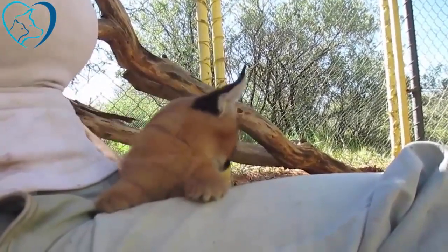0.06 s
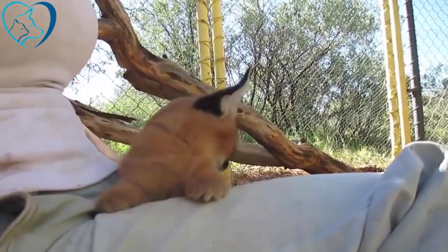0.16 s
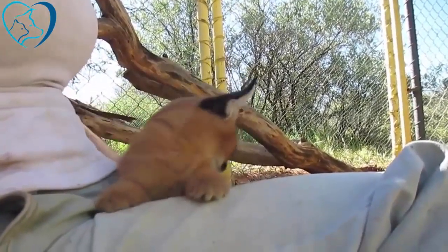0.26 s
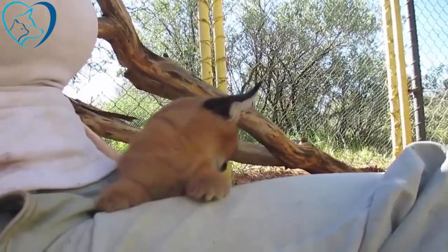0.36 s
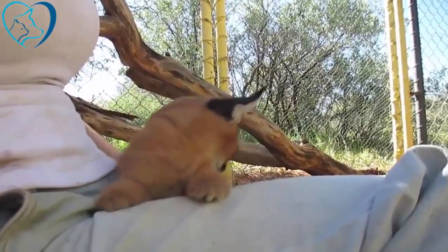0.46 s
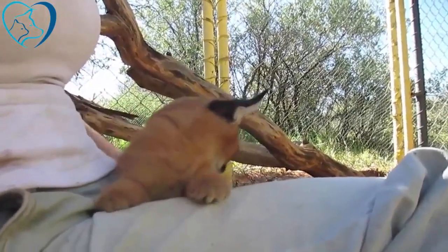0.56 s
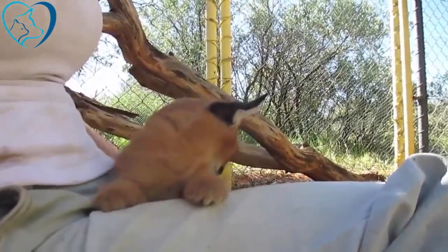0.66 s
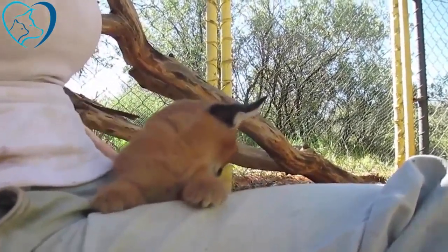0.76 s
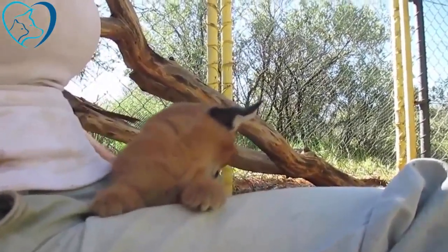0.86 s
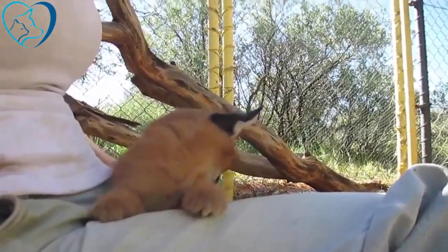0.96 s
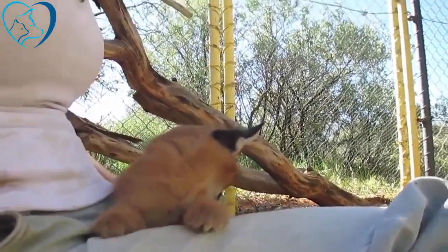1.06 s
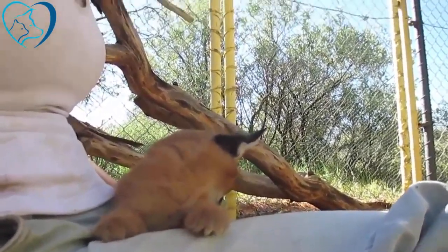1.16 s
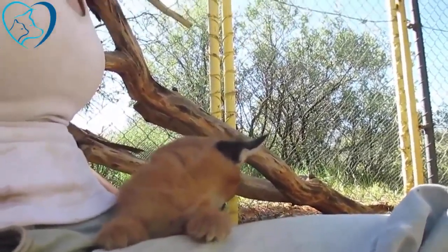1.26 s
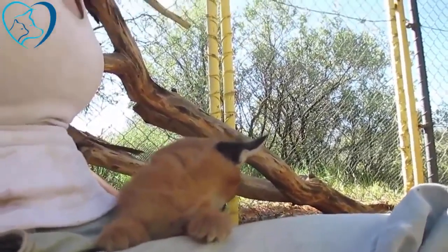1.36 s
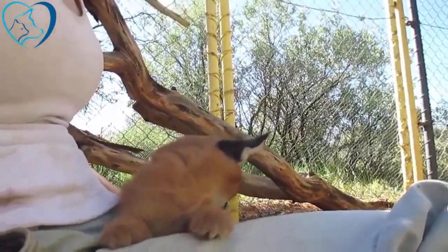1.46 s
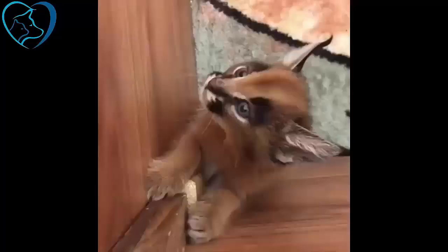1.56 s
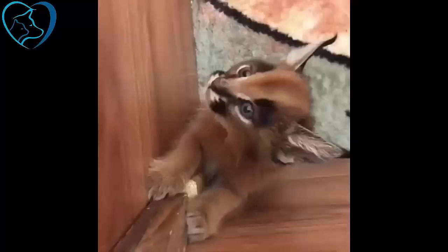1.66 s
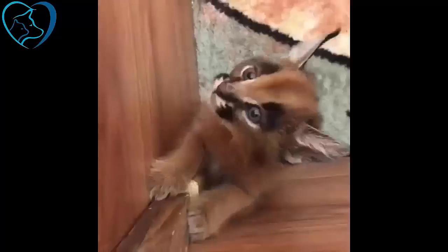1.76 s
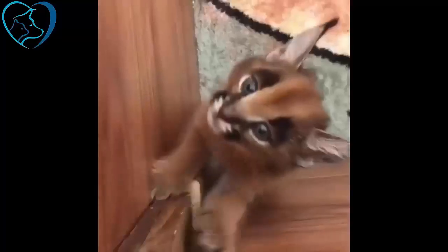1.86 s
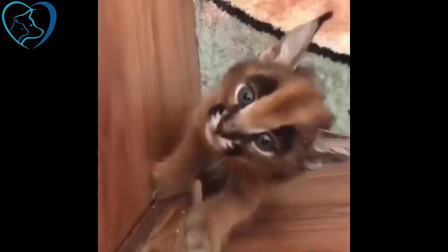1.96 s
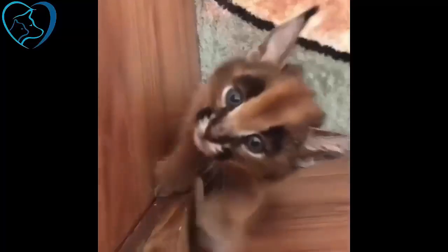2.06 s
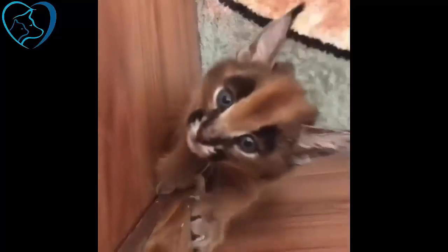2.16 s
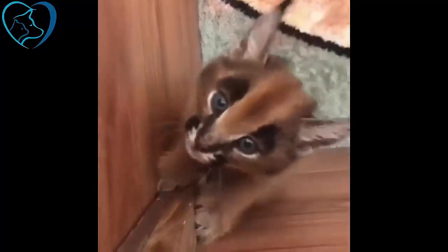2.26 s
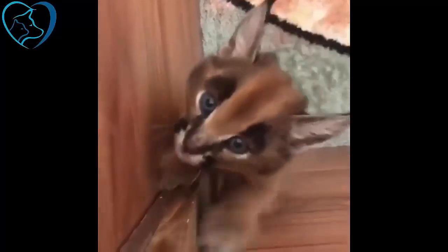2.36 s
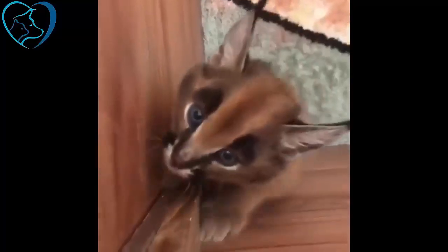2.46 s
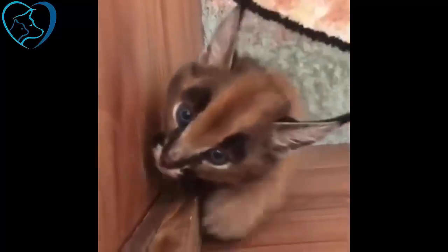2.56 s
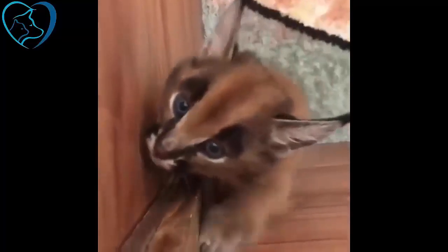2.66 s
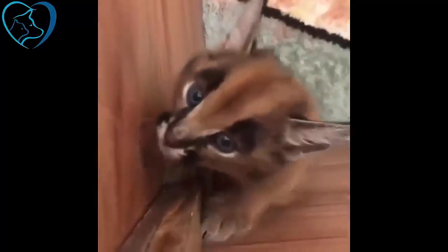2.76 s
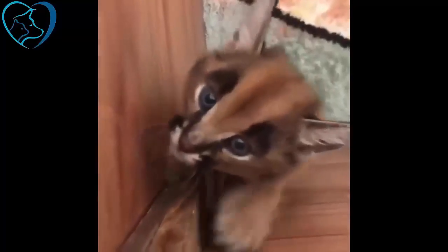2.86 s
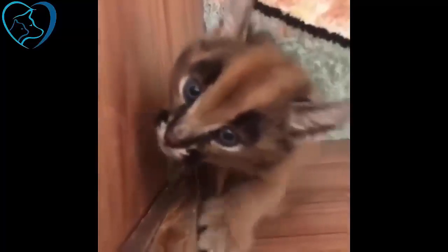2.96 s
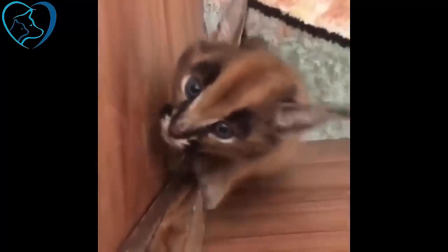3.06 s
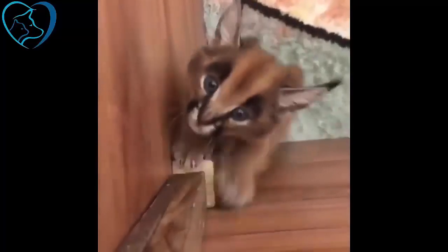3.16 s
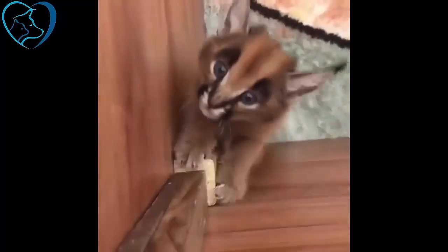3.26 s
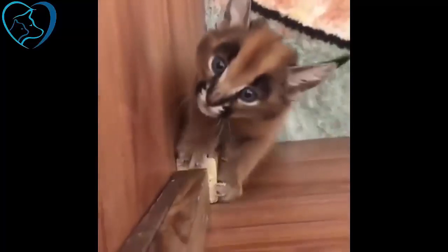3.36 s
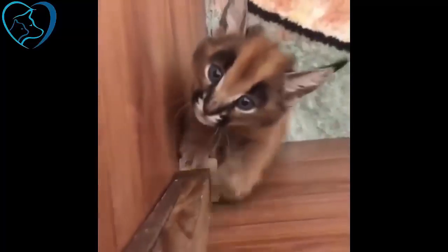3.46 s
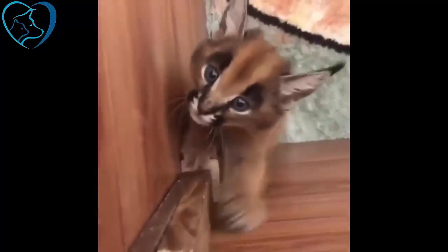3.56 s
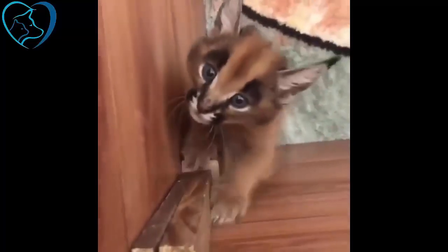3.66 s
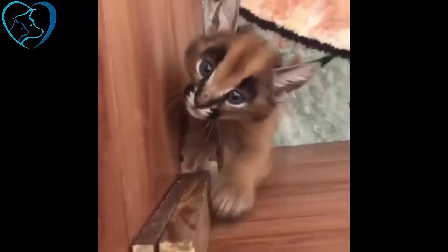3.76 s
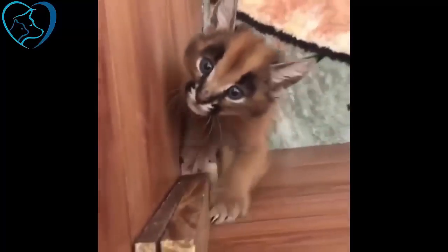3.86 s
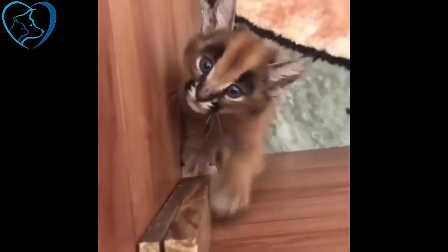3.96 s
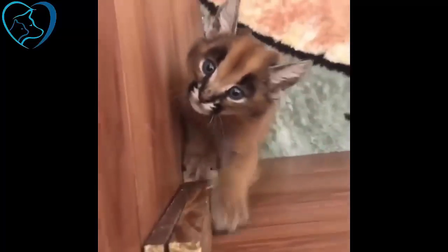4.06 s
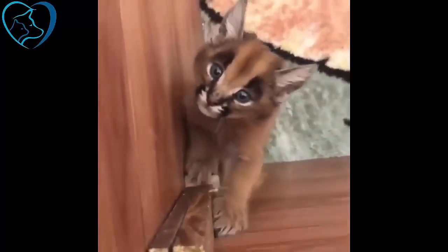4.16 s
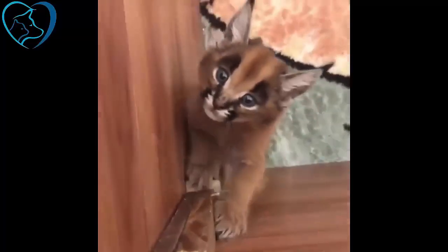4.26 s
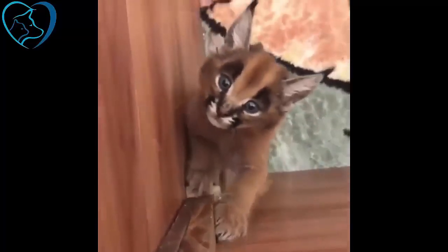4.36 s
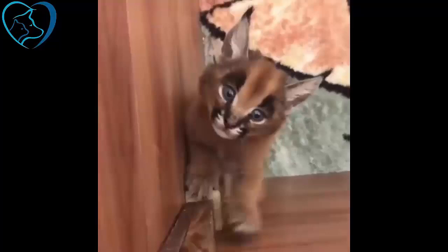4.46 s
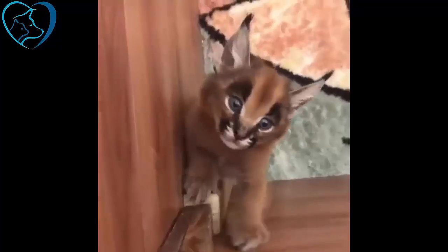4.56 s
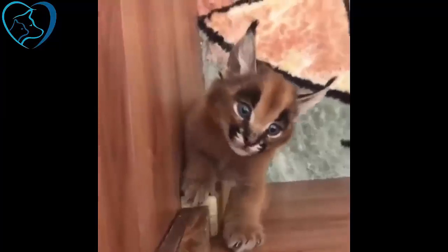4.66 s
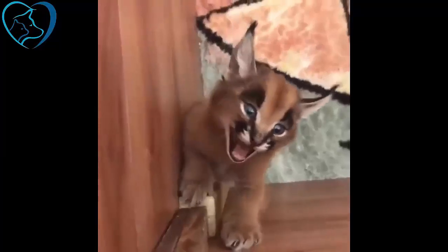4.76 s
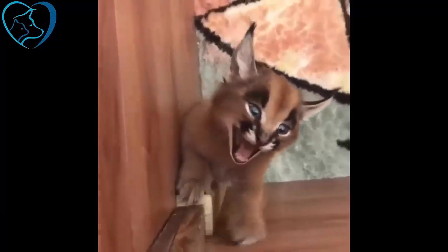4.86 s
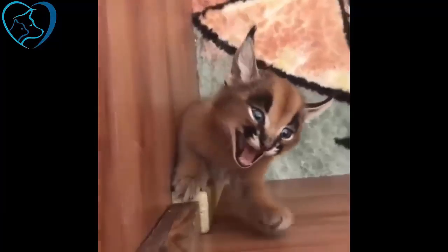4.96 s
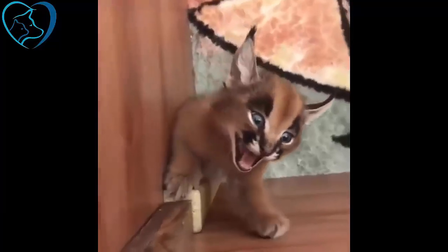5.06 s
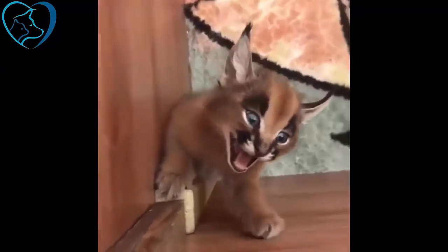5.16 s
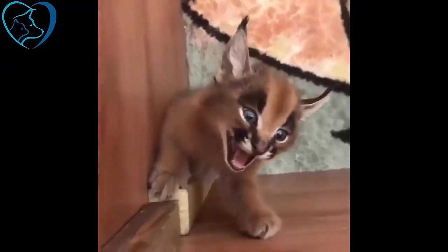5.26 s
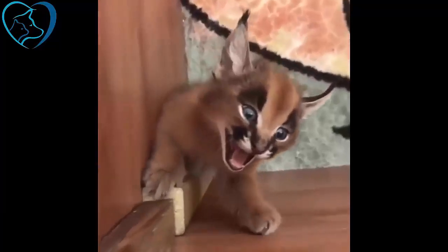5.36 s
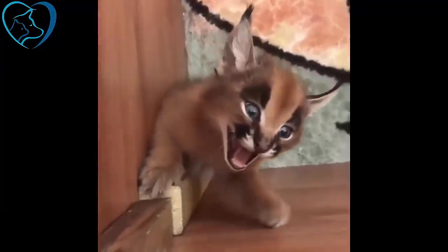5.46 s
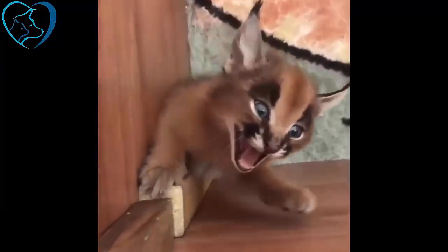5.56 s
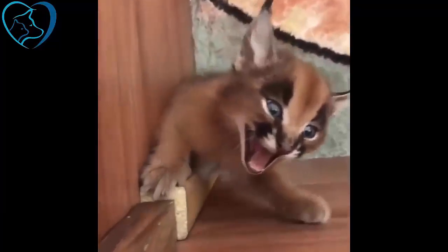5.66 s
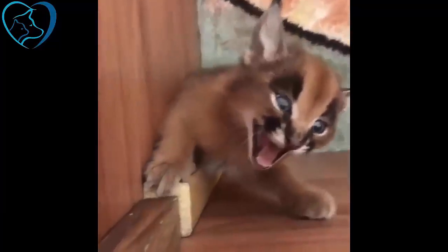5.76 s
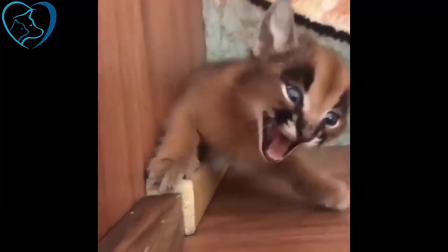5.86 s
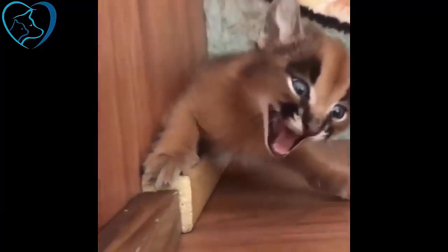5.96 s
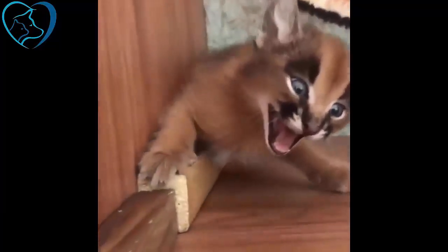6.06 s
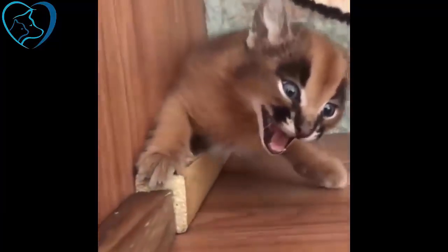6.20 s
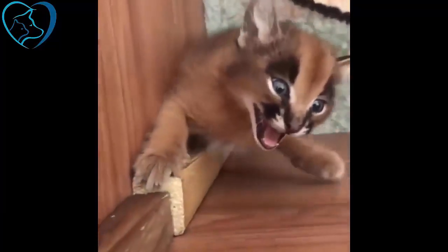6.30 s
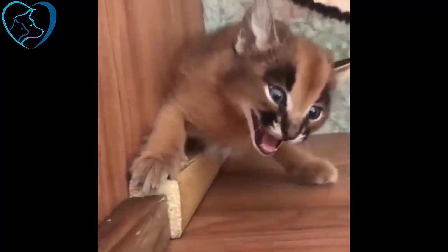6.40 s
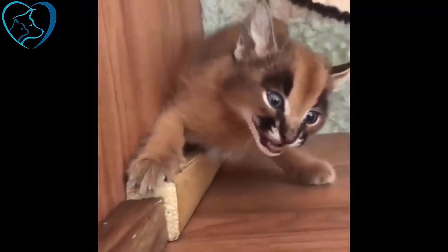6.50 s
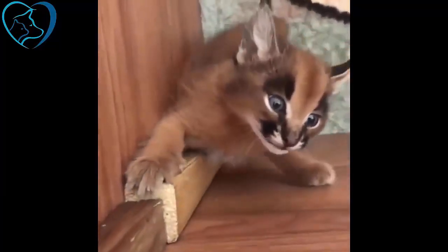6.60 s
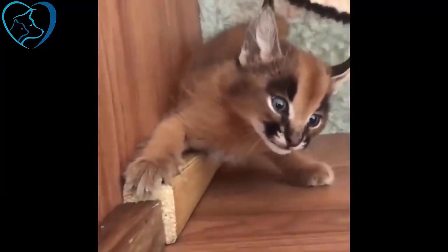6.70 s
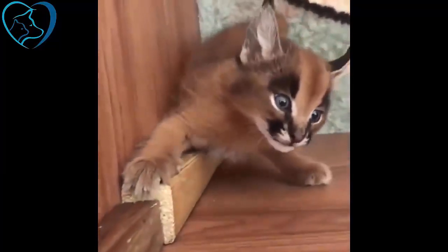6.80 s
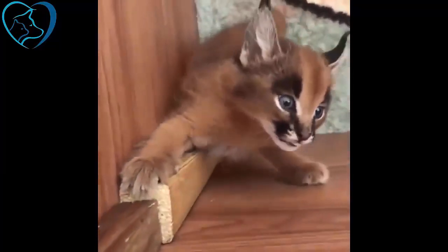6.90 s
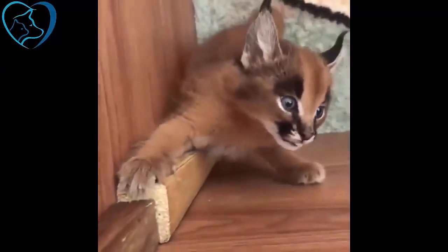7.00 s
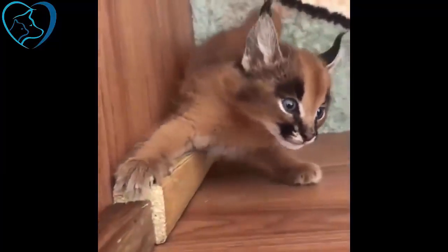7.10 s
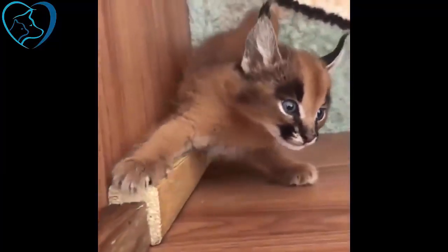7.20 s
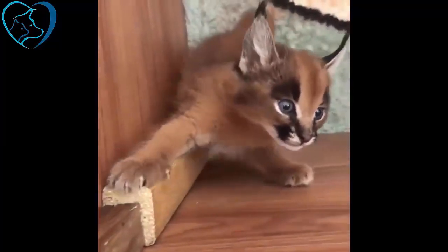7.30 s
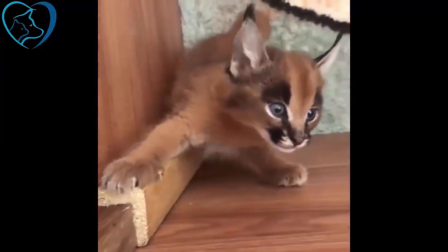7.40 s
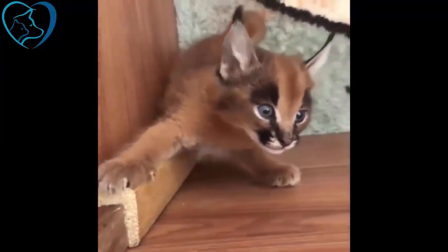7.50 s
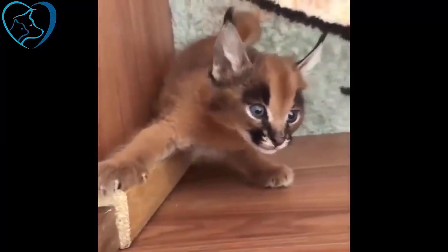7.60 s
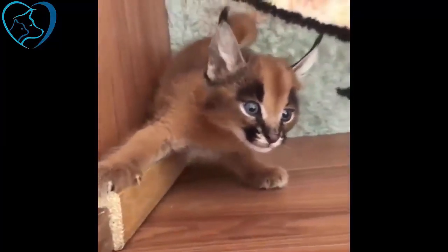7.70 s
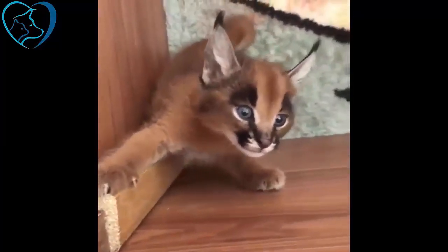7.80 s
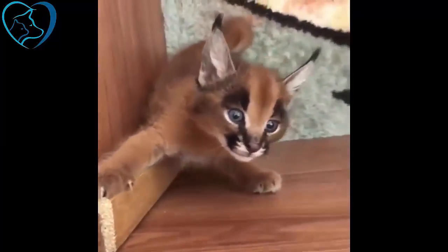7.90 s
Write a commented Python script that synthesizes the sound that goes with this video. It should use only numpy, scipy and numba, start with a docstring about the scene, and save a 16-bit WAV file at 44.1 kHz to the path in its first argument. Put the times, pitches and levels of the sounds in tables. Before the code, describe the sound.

An outdoor engine hum with rustling cloth stops dead, then claws scrabble and knock on wood before a kitten gives a long fluttering hiss.

```python
"""A wild kitten scrabbles on wooden boards, then gives a long hiss in two surges: its throat flutters
35-41 times a second, and each puff of air carries an arching whistle through the open mouth.
Claws are catching, slipping noise; knocks ring the modes of the wood; a small room answers.
Before that, outdoors, an engine hums in sines, an insect whines and clothing rustles in patchy noise;
this stops dead, and after a short silence the room's still air opens."""
import sys
import numpy as np
from scipy import signal
from scipy.fft import rfft, irfft, next_fast_len
from scipy.io import wavfile
from scipy.ndimage import uniform_filter1d
from numba import njit

SR = 44100
rng = np.random.default_rng(int(sys.argv[2]) if len(sys.argv) > 2 else 0)


def wav_out(sig):
    """Save sig, one row per channel (or a flat mono array), as 16-bit PCM at SR to the path in sys.argv[1]."""
    wavfile.write(sys.argv[1], SR, np.round(np.clip(np.atleast_2d(sig).T, -1, 1) * 32767).astype(np.int16))


N = 350154
T = np.arange(N) / SR

# when the outdoors stops and the room's air opens
CUT_S, ROOM_S = 1.452, 1.85

# engine hum, before its waver: t/s, f/Hz, level/dB
ENGINE_HUM = [(0, 111.2, -35.5), (.15, 103.5, -35), (.3, 90.7, -39), (.6, 94.3, -46.5), (.72, 98.35, -38.5),
              (.98, 97.7, -34), (1.06, 97, -40.5), (1.44, 99.4, -33)]
# a second drone that sinks away, before its waver: t/s, f/Hz, level/dB
SINKING_DRONE = [(0, 162.5, -33.5), (.12, 153, -36.5), (.28, 140.5, -43), (.5, 122.9, -45.5),
                 (.7, 120.8, -54)]
# resonances of the hollow rush: f/Hz, width/Hz, level/dB
RUSH_MODES = [(769.5, 90, 7), (911, 68, 6.5), (1200, 145, 6), (1420, 110, -12.5), (1688, 63, -2.5)]
# colour of the outdoor air: f/Hz, level/dB
OUTDOOR_COLOUR = [(15, -55), (25, -28.5), (63, -13), (99, -16.5), (126, -13.5), (202, -11.5), (250, -25),
                  (293, -17.5), (414, -31.5), (1190, -38.5), (1510, -37), (2780, -41.5), (14000, -64)]
# colour of the rustles: f/Hz, level/dB
RUSTLE_COLOUR = [(88, -35.5), (150, -3), (257, 0.5), (589, 2), (883, -3), (1200, -4.5), (1600, -11.5),
                 (2230, -9), (2700, -17.5), (4910, -15.5), (10400, -31), (15000, -30)]
# colour of the sliding cloth: f/Hz, level/dB
SLIDE_COLOUR = [(180, -21.5), (300, -10.5), (669, -10), (788, -6.5), (975, -11.5), (1350, -2.5),
                (1700, -11.5), (2780, -7), (3920, -17), (4930, -12.5), (7790, -26), (10600, -26.5),
                (15000, -36)]
# rustling clothes: t/s, level/dB, hold/s, release/s
RUSTLES = [(0, -54.5, 0.63, .1), (.51, -45.5, .025, 0.18), (.705, -33, .06, 0.043)]
# cloth sliding on cloth: t/s, level/dB, hold/s, release/s
SLIDES = [(1.04, -42.5, 0.079, 0.074), (1.14, -38, 0.052, 0.18), (1.25, -37.5, .03, 0.17)]
CLOTH_ATTACK_S = .09
# a single bird chip: t/s, peak level/dB, top f/Hz, length/s
BIRD_CHIP = [(.42, -48.5, 4840, 0.017)]
# bumps on the microphone body: t/s, peak level/dB
BUMPS = [(0.497, -16), (0.504, -15), (0.515, -27)]
# tiny ticks of twigs: t/s, peak level/dB
TWIG_TICKS = [(.553, -43), (.904, -43), (1.327, -29)]
# the hollow rush of air holds, then drops away
RUSH_DB, RUSH_FAINT_DB, RUSH_UNTIL_S, RUSH_RELEASE_S = -36, -53.5, 0.52, 0.17
# the insect sings out, then carries on faintly
INSECT_DB, INSECT_FAINT_DB, INSECT_UNTIL_S, INSECT_RELEASE_S = -63, -71.5, .5, .2

# colour of the room's still air: f/Hz, level/dB
ROOM_COLOUR = [(15, -43), (25, -9), (80, -6), (225, -13), (363, -9), (460, -18.5), (599, -11.5),
               (868, -16.5), (1260, -20.5), (1680, -24), (3440, -31.5), (11000, -36.5), (14000, -32.5)]
ROOM_AIR_DB = -68.35
# echoes from the boards of the corner: delay/ms, level/dB
CORNER_ECHOES = [(1.298, -27.5), (3.4, -18.5), (5.6, -18)]

# soft paw falls: t/s, peak level/dB, f/Hz, t60/s
PAW_FALLS = [(2.162, -41.5, 241, 0.23), (2.39, -45.5, 250, 1), (2.955, -58, 283, 0.11),
             (3.11, -28, 222, 0.077), (3.855, -44, 290, 0.3), (4.09, -53, 257, 0.39),
             (6.31, -45, 74.4, 0.55), (6.331, -48.5, 138, 0.56), (7.459, -52.5, 171, 0.96)]
# paws scuffing the boards: t/s, hold/s, claw scrape level/dB, wood grind level/dB, rumble level/dB
SCUFFS = [(2.261, 0.025, -52, -57.5, -54.5), (2.386, 0.014, -47.5, -58.5, -63),
          (2.455, 0.037, -56.5, -56.5, -51.5), (2.572, 0.08, -57.5, -54.5, -53),
          (2.722, 0.018, -59, -56, -53), (2.808, 0.0085, -49.5, -55, -53), (2.906, 0.019, -56, -59.5, -57),
          (2.958, 0.072, -60.5, -59, -48), (3.127, 0.0068, -40, -44.5, -38),
          (3.153, 0.019, -51, -36.5, -44), (3.213, .01, -41.5, -45.5, -41),
          (3.283, 0.017, -43.5, -41.5, -40), (3.325, 0.075, -53, -51.5, -49), (3.421, 0.026, -58, -50, -50),
          (3.539, 0.052, -66, -57.5, -58.5), (3.628, 0.1, -64.5, -64.5, -75),
          (3.853, 0.0049, -54.5, -64, -66), (3.913, .04, -64, -70.5, -66), (4.088, 0.038, -56.5, -64, -65),
          (4.328, 0.015, -60.5, -76, -67), (4.446, 0.2, -80.5, -78, -71), (6.374, 0.25, -77, -77, -66.5),
          (7.393, .08, -77.5, -87, -79), (7.867, 0.03, -77, -83, -84)]
# a scuff swells and dies quickly; the boards rumble on
SCUFF_ATTACK_S, SCUFF_RELEASE_S, RUMBLE_ATTACK_S, RUMBLE_RELEASE_S = 0.032, .06, 0.027, 0.22
# colour of the claws: f/Hz, level/dB
SCRAPE_COLOUR = [(900, -39), (2000, -12), (2700, -3.5), (3700, -1), (4400, 3), (5400, -5), (6700, -2.5),
                 (8000, -11), (10500, -14), (13000, -15)]
# colour of the ground wood: f/Hz, level/dB
GRIND_COLOUR = [(250, -31), (480, 2), (690, 8), (900, 4.5), (1150, 2), (1400, -1), (1650, -1),
                (2100, -14.5), (3000, -11), (4500, -38)]
# low resonances of the boards: f/Hz, width/Hz, level/dB
RUMBLE_MODES = [(87, 26, -0.5), (141, 13, 6.5), (197.6, 26, -0.5), (261.6, 17, -4.5), (315.4, 28, 2),
                (400.4, 19, -8), (478, 30, -10)]
# claw and wood knocks: t/s, level/dB, then against it body level/dB and untrimmed crack level/dB
KNOCKS = [(2.264, -33.5, -4.5, -25), (2.378, -34, -25, -3), (2.401, -28, -33, -1.5),
          (2.816, -28, -13.5, -9), (2.928, -46, -20, 3), (2.955, -20, -6.5, -7), (2.961, -23, -8.5, -14),
          (3.123, -46, -15, -15), (3.166, -23.5, -10, -4.5), (3.202, -13, -13.5, -3.5),
          (3.206, -15.5, -19, -1), (3.275, -24.5, -8.5, -15), (3.29, -39, -16, -8),
          (3.336, -25.5, -8, -10.5), (3.392, -27, -4, -2), (3.855, -31, -33, -2.5),
          (4.105, -32.5, -15.5, -6), (4.321, -58, -26, -13), (4.347, -44, -18, 3),
          (7.456, -38.5, -12, -13.5), (7.471, -49, -0.5, -9)]
# modes of the boards, before each knock's small detuning: f/Hz, t60/s, level/dB
BOARD_MODES = [(421, 0.14, -6), (635, 0.046, 1.5), (696, 0.094, 4.5), (814, 0.061, -1.5),
               (1030, 0.027, 2.5), (1170, 0.013, -2), (1760, 0.02, 3.5)]
# single claw scratches: t/s, peak level/dB, f/Hz, length/s
SCRATCHES = [(2.373, -38, 3700, 0.046), (2.8, -32.5, 4730, 0.033), (3.121, -31.5, 5800, 0.018),
             (3.273, -36, 6540, 0.058), (4.094, -35, 4470, .025)]

# small squeaks as the hiss starts and closes: t/s, peak level/dB, top f/Hz, length/s
SQUEAKS = [(4.917, -44.5, 1030, 0.011), (4.944, -35.5, 1685, 0.018), (6.731, -39.5, 670, 0.0095)]
# tick of the parting lips: t/s, peak level/dB
LIP_TICKS = [(4.941, -39.5)]
# flutter of the throat, in steps: start t/s, puff rate f/Hz
FLUTTER = [(4.926, 34.7), (5.07, 38.8), (5.276, 40.7), (5.669, 39.2), (5.873, 38.2), (6.135, 37.1),
           (6.485, 35.6)]
# effort, as the whistle's aim at the crest of a puff: t/s, f/Hz
EFFORT = [(4.98, 3150), (5.085, 4020), (5.21, 3420), (5.42, 3000), (5.52, 2300), (5.78, 2350), (5.87, 3650),
          (5.97, 3950), (6.3, 3170), (6.5, 2650), (6.59, 2250), (6.71, 1900), (6.735, 1050)]
# mouth opening: t/s, main resonance f/Hz, upper resonance level against it/dB
MOUTH = [(4.95, 3050, -16), (5.08, 3430, -3), (5.42, 3410, -17), (5.6, 3610, -7), (6.28, 3950, 0.5),
         (6.45, 4020, -18), (6.7, 4300, -23)]
# colour of the throat: f/Hz, level/dB
THROAT_COLOUR = [(200, -21), (550, -13.5), (800, -10.5), (1200, -4.5), (1700, -4.5), (2200, -1), (2700, -6),
                 (3200, -13), (4500, -24)]
# colour of the air over the teeth: f/Hz, level/dB
TEETH_COLOUR = [(3000, -44.5), (4700, -4.5), (5500, 6.5), (6500, 5.5), (7900, 0.5), (9000, 2), (11000, -16),
                (13300, -7), (16000, -25.5)]
HISS_START_S, HISS_END_S, HISS_ATTACK_S, HISS_RELEASE_S = 4.98, 6.734, .012, .04
# at first the throat chokes between puffs: depth of the gaps, and how long they last into the hiss
GAP_DB, GAPS_LAST_S = 15.5, 0.074
# above this pitch the whistle leaves the throat's resonance and rings the mouth ever harder
STRAIN_FROM_HZ, MOUTH_DB_PER_KHZ, THROAT_DB_PER_KHZ = 2730, 9, -2
# levels of mouth and throat at no strain
MOUTH_DB, THROAT_DB = -42.5, -44
# as the effort slackens below this pitch the hiss fades and the whistle stands clearer of the breath
SLACK_FROM_HZ, SLACK_DB_PER_KHZ, CLEAR_DB_PER_KHZ = 2200, -6.5, 6.5
WHISTLE_DB = -1.5  # against the breath, at the crest of a puff with no slack
# the teeth are bared in the second surge: moment and level of the widest snarl, opening and relaxing
SNARL_S, SNARL_DB, SNARL_ATTACK_S, SNARL_RELEASE_S = 5.997, -35.5, 0.32, 1.12
UPPER_MOUTH_HZ = 4510
TOP_HZ = 14000


def undb(db):
    """Decibels to gain."""
    return 10 ** (np.asarray(db) / 20)


def unit(x):
    """Scale to rms 1."""
    return x / np.sqrt(np.mean(x ** 2))


def curves(rows):
    """The columns of a table as straight lines in time."""
    s, *columns = np.transpose(rows)
    return [np.interp(T, s, c) for c in columns]


def between(start, end):
    """A gate with 4 ms edges."""
    gate = ((T >= start) & (T < end)) * 1.
    return uniform_filter1d(gate, size=176)


def envelope(s, attack, hold, release, t=T):
    """Full level from s for the hold; attack and release are the times for a change of 20 dB."""
    before, after = (s - t) / attack, (t - s - hold) / release
    return 10 ** -np.minimum(np.maximum(np.maximum(before, after), 0), 10)


def strokes(rows, attack):
    """Joint level of overlapping (s, dB, hold s, release s) strokes, summed as power."""
    t = T[::32]  # a coarse clock is enough for levels
    power = sum((undb(db) * envelope(s, attack, hold, release, t)) ** 2 for s, db, hold, release in rows)
    return np.interp(T, t, np.sqrt(power))


def subside(loud_db, faint_db, until, release):
    """A level that holds, then sinks to a faint rest."""
    return np.maximum(undb(loud_db) * envelope(0, 1, until, release), undb(faint_db))


def fade(t, t60):
    """Exponential decay, 60 dB in t60 seconds."""
    return np.exp(-np.log(1000) * t / t60)


def noise():
    """White noise."""
    return rng.standard_normal(N)


def walk(rate):
    """Random drift: points at the given rate joined by lines; it rests once 4000 are used up."""
    return 1.2 * np.interp(T * rate, np.arange(4000), rng.standard_normal(4000))


def grains(patchy_db, rate):
    """Friction: noise whose level jumps about as it catches and slips."""
    return noise() * undb(patchy_db * walk(rate))


def colour(x, points):
    """Shape a sound by (Hz, dB) points, straight on a log-pitch axis; rms 1."""
    hz, db = np.transpose(points)
    size = next_fast_len(N)
    f = np.maximum(np.fft.rfftfreq(size, 1 / SR), 1)
    gain = undb(np.interp(np.log(f), np.log(hz), db))
    return unit(irfft(rfft(x, size) * gain, size)[:N])


@njit
def svf(x, hz, width):
    """Band-pass (state-variable filter) whose centre may move."""
    y, b, l = np.empty(len(x)), 0., 0.
    for i in range(len(x)):
        g, k = np.tan(np.pi * min(hz[i], .45 * SR) / SR), width / hz[i]
        v = (b + g * (x[i] + 1e-18 - l)) / (1 + g * (g + k))
        b, l, y[i] = 2 * v - b, l + 2 * g * v, k * v
    return y


def band(x, hz, width):
    """A resonance applied twice, for steep sides."""
    hz = hz + np.zeros(len(x))
    return svf(svf(x, hz, float(width)), hz, float(width))


def cavity(x, hz, width):
    """A moving resonance, run backward then forward to keep the phase and blend with its neighbours."""
    backward = svf(x[::-1].copy(), hz[::-1].copy(), float(width))
    return svf(backward[::-1].copy(), hz, float(width))


def resonate(x, modes):
    """A sum of (Hz, width, dB) resonances."""
    return sum(undb(db) * band(x, hz, width) for hz, width, db in modes)


def add(out, s, x, db):
    """Mix a short sound in at time s, with its peak at db."""
    i = int(s * SR)
    out[i:i + len(x)] += (x * undb(db) / np.abs(x).max())[:N - i]


def tone(rows, second_db, waver):
    """A wavering hum with its octave."""
    hz, db = curves(rows)
    phase = 2 * np.pi * np.cumsum(hz * (1 + waver * walk(40))) / SR
    hum = unit(np.sin(phase) + undb(second_db) * np.sin(2 * phase))
    return hum * undb(db + 0.48 * walk(24.68))


def engine():
    """Engine hum and a second drone, each a wavering sine with a weaker octave."""
    return tone(ENGINE_HUM, second_db=-13.5, waver=0.018) + tone(SINKING_DRONE, second_db=-24.5, waver=0.073)


def rush():
    """A hollow rush of air: noise through a few resonances."""
    level = subside(RUSH_DB, RUSH_FAINT_DB, RUSH_UNTIL_S, RUSH_RELEASE_S)
    return unit(resonate(noise(), RUSH_MODES)) * level * undb(1.4 * walk(33))


def insect():
    """A thin, high whine: one sine trembling in pitch and level."""
    whine = np.sin(2 * np.pi * np.cumsum(7880 + 35 * walk(300)) / SR)
    level = subside(INSECT_DB, INSECT_FAINT_DB, INSECT_UNTIL_S, INSECT_RELEASE_S)
    return unit(whine) * level * undb(walk(50))


def clothes():
    """Cloth rustling and sliding: patchy friction noise in two colours."""
    rustle = colour(grains(patchy_db=3.5, rate=440), RUSTLE_COLOUR)
    slide = colour(grains(patchy_db=2.0, rate=630) * undb(1.3 * walk(70)), SLIDE_COLOUR)
    return rustle * strokes(RUSTLES, CLOTH_ATTACK_S) + slide * strokes(SLIDES, CLOTH_ATTACK_S)


def chirps(rows, bend=0.47):
    """Short whistles with a faint octave that arch up and down."""
    out = np.zeros(N)
    for s, db, hz, length in rows:
        arch = np.sin(np.linspace(0, np.pi, int(length * SR)))
        phase = 2 * np.pi * np.cumsum(hz * (1 - bend + bend * arch)) / SR
        add(out, s, arch * (np.sin(phase) + undb(-11.5) * np.sin(2 * phase)), db)
    return out


def bumps():
    """Dull bumps on the microphone body: a sharp decay through two broad resonances."""
    out, t = np.zeros(N), T[:4000]
    for s, db in BUMPS:
        thump = resonate(fade(t, 0.0029), [(297, 730, 0), (1070, 1400, -2)])
        add(out, s, band(thump, 550, 3600), db)
    return out


def ticks(rows):
    """Tiny dry clicks: quickly fading bursts of bright noise."""
    out, t = np.zeros(N), T[:SR // 20]
    for s, db in rows:
        burst = rng.standard_normal(len(t)) * fade(t, 0.0092)
        add(out, s, band(burst, 3300, 8000), db)
    return out


def outdoors():
    """Everything outdoors over a bed of coloured air, stopped dead by a gate."""
    air = colour(noise(), OUTDOOR_COLOUR) * undb(-41.0)
    out = engine() + rush() + insect() + air + clothes()
    return (out + chirps(BIRD_CHIP) + bumps() + ticks(TWIG_TICKS)) * between(0, CUT_S)


def room_air():
    """Still air as coloured noise, with a fan whine of two narrow resonances."""
    still = colour(noise(), ROOM_COLOUR) * undb(ROOM_AIR_DB)
    fan = unit(resonate(noise(), [(602, 23, -10.0), (863.0, 22.1, -1.5)])) * undb(-77)
    return (still + fan) * between(ROOM_S, N / SR + 1)


def room(x, t60=0.19, wet_db=-16.5, late_t60=0.74, late_db=-35):
    """A short furnished-room tail and a faint longer ring, made of decaying noise, over the still air."""
    t = T[:SR]
    early = band(rng.standard_normal(len(t)), 2600, 11000) * fade(t, t60) * (t > .003)
    late = resonate(rng.standard_normal(len(t)), [(2080, 900, -2), (4010, 880, 0)]) * fade(t, late_t60)
    tail = (undb(wet_db) * unit(early) + undb(late_db) * unit(late)) / np.sqrt(len(t))
    return x + signal.fftconvolve(x, tail)[:N] + room_air()


def paws():
    """Padded paws only thud: fading noise through one low resonance, half a second at most."""
    out, t = np.zeros(N), T[:SR // 2]
    for s, db, hz, t60 in PAW_FALLS:
        add(out, s, band(rng.standard_normal(len(t)) * fade(t, t60), hz, 89), db)
    return out


def scrabble(snags_hz=70, snag_db=16, ring_db=0):
    """Claws scrape in uneven slips, snag and grind the wood, while the body rumbles over the boards."""
    claws = strokes([(s, db, hold, SCUFF_RELEASE_S) for s, hold, db, _, _ in SCUFFS], SCUFF_ATTACK_S)
    grind = strokes([(s, db, hold, SCUFF_RELEASE_S) for s, hold, _, db, _ in SCUFFS], SCUFF_ATTACK_S)
    weight = strokes([(s, db, hold, RUMBLE_RELEASE_S) for s, hold, _, _, db in SCUFFS], RUMBLE_ATTACK_S)
    slips = grains(patchy_db=3.5, rate=1100) * undb(2 * walk(130))
    snags = (rng.random(N) < snags_hz / SR) * noise() * undb(snag_db)
    boards = colour(noise(), [(30, -12.5), (70, 1.5), (110, -4), (220, 5.0), (320, -7.5), (450, -7), (900, -34.5)])
    boards = unit(boards + undb(ring_db) * unit(resonate(noise(), RUMBLE_MODES)))
    scrape = colour(slips + snags, SCRAPE_COLOUR) * claws
    return scrape + colour(slips, GRIND_COLOUR) * grind + boards * weight


def board_ring(t):
    """The boards' modes as decaying sines, a little different in pitch and level at every knock."""
    ring = np.zeros(len(t))
    for hz, t60, db in BOARD_MODES:
        gain = undb(db + rng.standard_normal())
        turns = hz * rng.normal(1, 0.033) * t + rng.random()
        ring += gain * fade(t, t60) * np.sin(2 * np.pi * turns)
    return ring


def knocks(crack_t60=0.021, crack_trim_db=-4.0):
    """Claws crack on the wood, a burst of bright noise, and ring its modes."""
    out, t = np.zeros(N), T[:SR // 2]
    crack_modes = [(3070, 1740, 2.5), (4130, 390, -2), (6370, 2060, -4.5), (12700, 1200, -11.0)]
    for s, db, body_db, crack_db in KNOCKS:
        add(out, s, board_ring(t), db + body_db)
        crack = resonate(rng.standard_normal(len(t)) * fade(t, crack_t60), crack_modes)
        add(out, s, crack, db + crack_db + crack_trim_db)
    return out


def scratches(slips_hz=450):
    """A claw catches and slips on the grain, random impulses ringing one resonance."""
    out = np.zeros(N)
    for s, db, hz, length in SCRATCHES:
        size = int(length * SR)
        slips = (rng.random(size) < slips_hz / SR) * rng.uniform(.5, 1, size)
        slips = slips + 0.017 * rng.standard_normal(size)
        add(out, s, band(slips * np.hanning(size), hz, 1750), db)
    return out


def puffs(rise, fall):
    """Air pressure in the fluttering throat, 0 to 1: it builds slowly to a crest and collapses."""
    s, hz = np.transpose(FLUTTER)
    rate_hz = hz[np.maximum(np.searchsorted(s, T) - 1, 0)]
    turns = np.cumsum(rate_hz) / SR
    phase = (turns - np.interp(s[0], T, turns) + .012 * walk(50)) % 1  # the crest lies at 0
    building = np.maximum(1 - (1 - phase) / rise, 0)
    collapsing = np.maximum(1 - phase / fall, 0)
    return np.sin(np.pi / 2 * np.maximum(building, collapsing)) ** 2.4


def whistle(pressure, crest_hz, low_hz=780, skip_hz=3200, skip_width_hz=330, upper_db=8):
    """Pitch follows the pressure, skipping over an unstable zone into a louder, purer upper register."""
    hz = low_hz + (crest_hz - low_hz) * pressure
    hz = hz * (1 + .03 * walk(70) + .016 * walk(600))
    offset = (hz - skip_hz) / skip_width_hz
    hz = hz + skip_width_hz * offset * np.exp(-offset ** 2 / 2)  # pushed away from the zone
    upper = (1 + np.tanh(4 * offset)) / 2
    phase = 2 * np.pi * np.cumsum(hz) / SR
    overtones = sum(undb(db) * np.sin(k * phase) for k, db in [(2, 0), (3, -5), (4, -12)])
    voice = undb(upper_db * upper) * np.sin(phase) + overtones
    return voice * undb(3 * pressure + 2.5 * walk(110))


def throat_breath(pressure):
    """Coloured noise swelling with each puff; the narrowed throat passes fewer lows."""
    breath = colour(noise(), [(200, 0.5), (900, 3), (4000, 6.5), (14000, -4.5)])
    breath = breath * undb(3 * pressure + 1.5 * walk(250))
    return breath - pressure * cavity(breath, np.full(N, 900.), 1900)


def steady(x):
    """Hold the level near 1 over a few puffs, keeping the flutter."""
    power = uniform_filter1d(uniform_filter1d(x ** 2, size=2300), size=1150)
    return x / np.sqrt(np.abs(power) + 1e-12)


def mouth_cavity(air, main_width_hz=1200, upper_width_hz=1000, fizz_db=-28):
    """Two resonances of the open mouth, the main one moving, plus air brushing past the lips."""
    main_hz, upper_db = curves(MOUTH)
    main = cavity(air, main_hz, main_width_hz)
    upper = undb(upper_db) * cavity(air, np.full(N, UPPER_MOUTH_HZ * 1.), upper_width_hz)
    fizz = unit(band(noise(), 9500, 8100)) * undb(fizz_db)
    return steady(main + upper) + fizz


def kitten(trough_db=-8):
    """Each puff bends a whistle up and down; whistle and breath ring the throat, mouth and teeth."""
    pressure = puffs(rise=.68, fall=.33)
    crest_hz, = curves(EFFORT)
    strain_khz = np.maximum(crest_hz - STRAIN_FROM_HZ, 0) / 1000
    slack_khz = np.maximum(SLACK_FROM_HZ - crest_hz, 0) / 1000
    breath = throat_breath(pressure)
    whistle_db = WHISTLE_DB + CLEAR_DB_PER_KHZ * slack_khz + trough_db * (1 - pressure) ** 2
    air = breath + whistle(pressure, crest_hz) * undb(whistle_db)
    mouth = mouth_cavity(air) * undb(MOUTH_DB + MOUTH_DB_PER_KHZ * strain_khz)
    throat = steady(colour(air, THROAT_COLOUR)) * undb(THROAT_DB + THROAT_DB_PER_KHZ * strain_khz)
    snarl = undb(SNARL_DB) * envelope(SNARL_S, SNARL_ATTACK_S, 0, SNARL_RELEASE_S)
    teeth = steady(colour(air, TEETH_COLOUR)) * snarl
    choke = np.exp(-(np.maximum(T - HISS_START_S, 0) / GAPS_LAST_S) ** 2)
    gaps = undb(-GAP_DB * (1 - pressure) * choke)
    flow = envelope(HISS_START_S, HISS_ATTACK_S, HISS_END_S - HISS_START_S, HISS_RELEASE_S)
    flow = flow * undb(SLACK_DB_PER_KHZ * slack_khz)
    return (mouth + throat + teeth) * gaps * flow + chirps(SQUEAKS) + ticks(LIP_TICKS)


def corner(x):
    """The wooden walls close around the kitten each throw back one early echo."""
    return x + sum(undb(db) * np.interp(T - ms / 1000, T, x) for ms, db in CORNER_ECHOES)


def scene():
    """First the outdoors, then the kitten in its corner of the room."""
    garden = outdoors()
    hiss = corner(kitten())
    boards = scrabble() + scratches() + knocks() + paws()
    return (garden + room(hiss + boards))[None]


def record(dry):
    """A steep low-pass cuts the top of the treble."""
    return signal.sosfilt(signal.ellip(8, .2, 70, TOP_HZ, fs=SR, output="sos"), dry)


dry = scene()
out = record(dry)
wav_out(out)
```